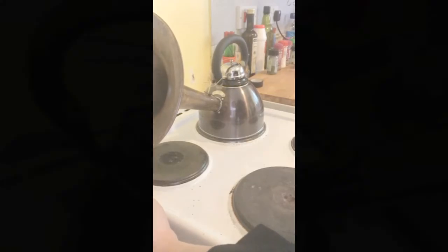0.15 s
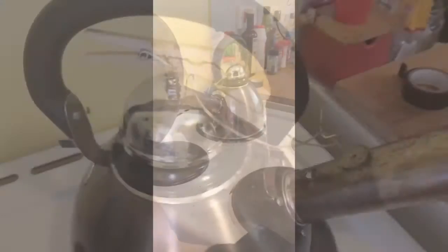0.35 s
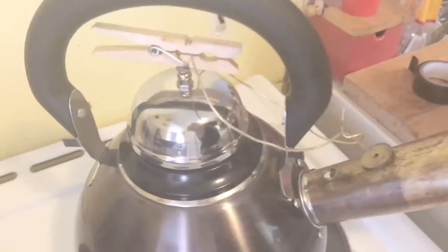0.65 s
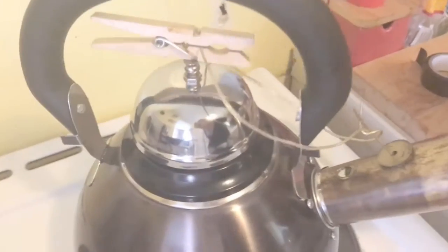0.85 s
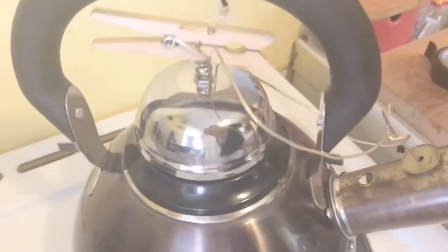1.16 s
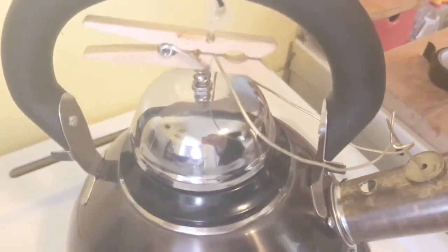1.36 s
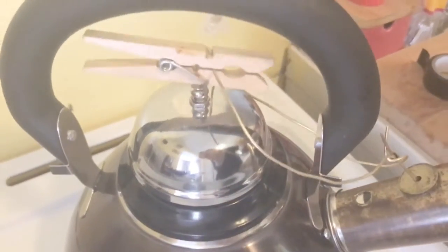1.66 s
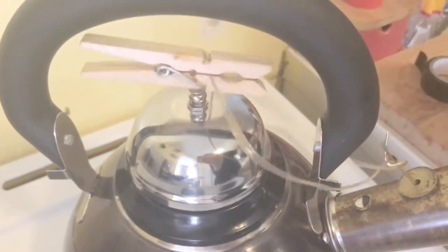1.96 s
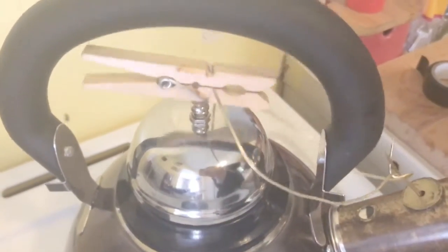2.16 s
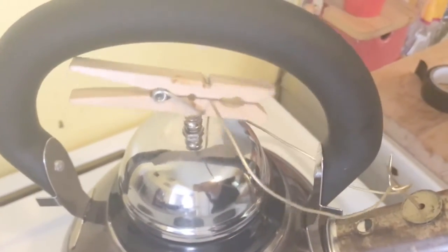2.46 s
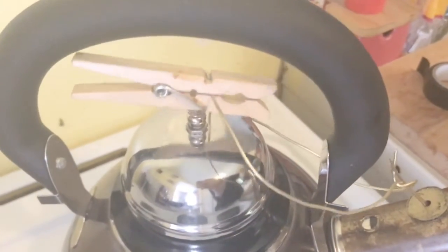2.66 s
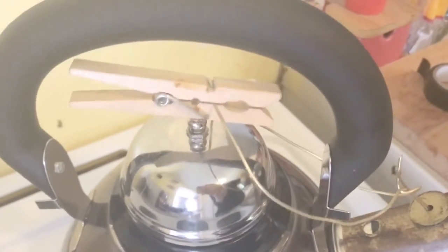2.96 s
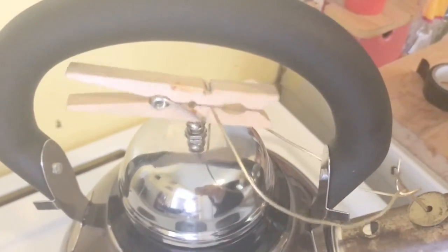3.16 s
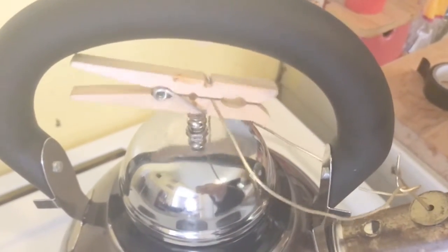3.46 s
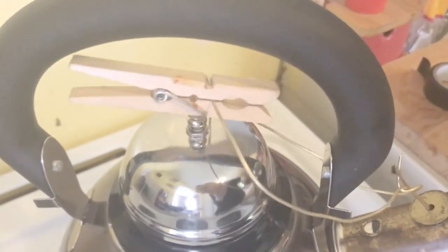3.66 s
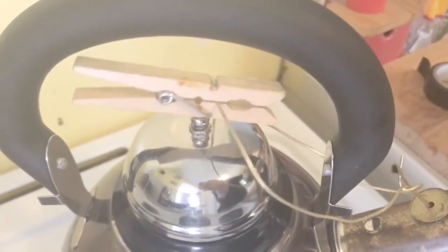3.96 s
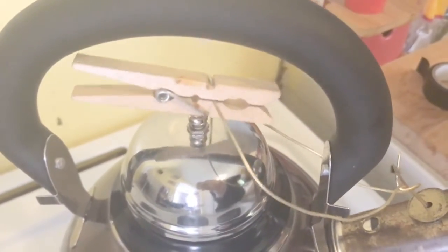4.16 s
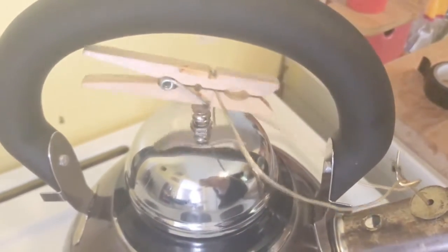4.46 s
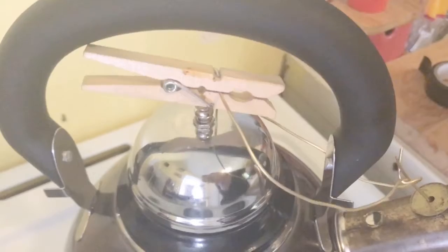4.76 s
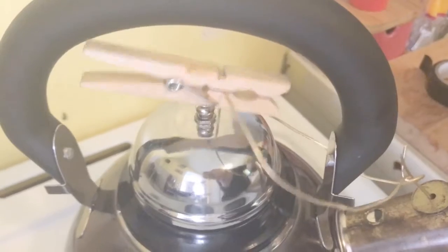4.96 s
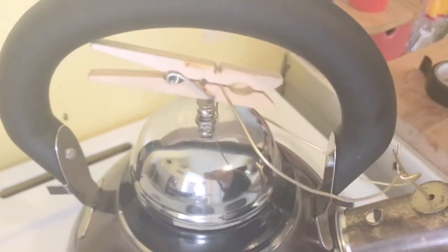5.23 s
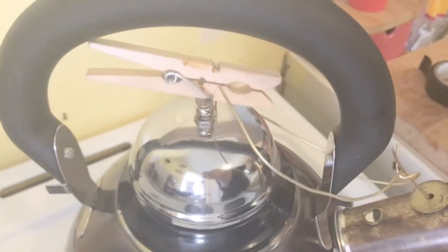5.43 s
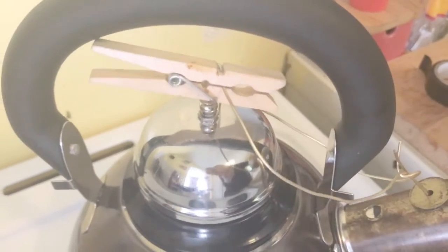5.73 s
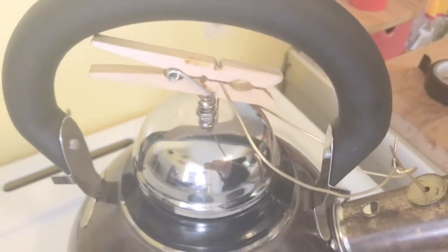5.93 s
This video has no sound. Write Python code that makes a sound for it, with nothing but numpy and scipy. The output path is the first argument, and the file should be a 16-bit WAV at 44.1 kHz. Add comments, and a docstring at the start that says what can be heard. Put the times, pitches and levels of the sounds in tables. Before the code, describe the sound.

A steel kettle rocks on a hotplate, knocking hollowly about five times a second with sharp metal clicks over faint simmering and low hum.

```python
"""Knocks about five times a second, many answered by a sharp metal click, over a simmer and a low hum.
A steel kettle rocks on a hotplate as its water heats, close to the microphone, in a small kitchen.
Each knock sums struck modes of base, hollow and body with bursts of coloured noise for scrape and tick.
Clicks are noise cracks with a short shell ring; blows of both kinds feed the long ring of the lid's dome.
Simmer and bubbles are shaped noise, with pings and thumps; the hum is two sines."""
import sys
import numpy as np
from scipy import signal
from scipy.fft import rfft, irfft, next_fast_len
from scipy.io import wavfile
from scipy.ndimage import map_coordinates

SR = 44100
rng = np.random.default_rng(int(sys.argv[2]) if len(sys.argv) > 2 else 0)


def output_pcm(signal):
    """Save a mono or channel-first signal as 16-bit PCM at the path in sys.argv[1].

    Samples are clipped to [-1, 1] before scaling.
    """
    pcm = np.clip(np.atleast_2d(signal).T, -1, 1) * 32767
    wavfile.write(sys.argv[1], SR, np.round(pcm).astype(np.int16))


N = 268613

# kettle landings on the plate: (time [s], level [dB], hardness [0 soft tilt - 1 hard landing])
LANDINGS = [(0.309, -49, 0), (0.357, -37.5, 1), (0.505, -34.5, 0.19), (0.551, -32, 0.87), (0.698, -30.5, 0),
            (0.745, -28.5, 0.86), (0.888, -30, 0.27), (0.932, -25, 0.89), (1.08, -45.5, 0.59),
            (1.255, -44, 0.15), (1.282, -38.5, 0.57), (1.441, -44, 0), (1.637, -38.5, 0.19),
            (1.66, -31.5, 0.83), (1.821, -47, 0.47), (2.007, -29.5, 0.13), (2.042, -28.5, 0.96),
            (2.219, -26.5, 0.17), (2.269, -24, 0.92), (2.41, -26, 0.13), (2.459, -25.5, 0.82),
            (2.617, -35, 0), (2.641, -29, 0.64), (2.824, -31.5, 0.85), (3.002, -28.5, 0.11),
            (3.038, -26, 0.91), (3.198, -31, 0.29), (3.236, -24.5, 0.87), (3.42, -33.5, 0.65),
            (3.604, -31.5, 0.77), (3.803, -32.5, 0.75), (3.989, -31.5, 0.84), (4.197, -32.5, 1),
            (4.368, -31.5, .2), (4.397, -31.5, 0.69), (4.547, -29.5, 0.21), (4.6, -26, 0.74),
            (4.787, -44.5, 0.92), (4.937, -33.5, 0.56), (4.984, -31, 0.82), (5.151, -32.5, 0.59),
            (5.178, -31, .75), (5.314, -36.5, 0.55), (5.368, -36, 0.56), (5.57, -39.5, .55),
            (5.72, -37.5, 0.51), (5.771, -38.5, 0.52), (5.839, -35.5, 0.78), (5.923, -43.5, 0.57),
            (6.005, -32.5, 0.77)]
# loose metal snaps: (time [s], level [dB], extra drive to the dome [dB])
SNAPS = [(0.5666, -26.5, 8), (0.764, -17.5, -3), (0.948, -23, 1), (1.1137, -23.5, 4), (1.6735, -22.5, 0.5),
         (1.858, -22, 4), (2.0755, -12.5, 2), (2.1771, -23, -10), (2.2892, -20, 8.5), (2.4813, -15.5, 6),
         (2.6592, -22.5, -35), (2.8669, -16, -11), (2.9591, -27.5, 7), (3.2563, -13, 1), (3.2703, -25, 7),
         (3.3399, -31, -18), (3.6334, -18, 2.5), (3.8344, -18, 6.5), (4.0372, -17, 1), (4.049, -25.5, -7),
         (4.106, -29.5, -15), (4.249, -21.5, -26), (4.4326, -21, 3.5), (4.6323, -19.5, -0.5),
         (4.8028, -26.5, -20), (5.0201, -11, 2), (5.2267, -25.5, -7.5), (5.4062, -19.5, 4.5),
         (5.6048, -17, 4.5), (5.803, -18, 1), (6.0011, -22, 1)]
# water-filled body on the stove top: (frequency [Hz], relative level [dB], t60 [s])
BODY_MODES = [(135.3, -11.5, 0.35), (155.4, -3.5, 0.25), (173.5, -4, 0.32), (260, -14, 0.068),
              (256, -3.5, 0.35), (261.9, -1.5, 0.29), (272, -6.5, 0.059), (330, -7, 0.1)]
# hollow clunk noise: (frequency [Hz], relative density [dB])
CLUNK_SPECTRUM = [(300, -40), (500, -36), (650, 9), (790, -10), (950, 2.5), (1150, 9.5), (1450, 3.5),
                  (1900, -0.5), (2500, -13), (5000, -55)]
# scraping steel noise: (frequency [Hz], relative density [dB])
SCRAPE_SPECTRUM = [(1500, -4), (2400, -8.5), (3200, 4), (4050, 5.5), (5000, 3.5), (6000, 2), (7500, 0.5),
                   (9500, 4.5), (10400, -26), (12000, -12), (16000, -29)]
# hard-contact tick noise: (frequency [Hz], relative density [dB])
TICK_SPECTRUM = [(1000, -21.5), (4000, -7.5), (7500, -12.5), (9700, -0.5), (10400, -0.5), (11400, 10),
                 (12100, 1), (12700, 7), (14000, -5), (14900, 1), (16000, -20)]
# dense shell ring: (frequency [Hz], relative density [dB])
CLANG_SPECTRUM = [(150, -1), (450, -2.5), (1000, -2), (2400, 1.5), (3750, 10), (4900, -2.5), (6200, 8),
                  (7700, 3), (9600, 5), (10350, -9), (11400, 11.5), (12500, -2), (14400, 2.5), (15100, 2),
                  (15700, -17), (16300, -43)]


def amp(db):
    """Decibels to gain."""
    return 10 ** (np.asarray(db) / 20)


def unit(x):
    """Scale to rms 1."""
    return x / np.sqrt(np.mean(x ** 2) + 1e-20)


def along(points, hz):
    """Interpolate (Hz, value) points on a log frequency axis."""
    point_hz, values = np.transpose(points)
    return np.interp(np.log(hz + 1), np.log(point_hz), values)


def wobble(rate_hz):
    """A smooth random curve with rate_hz knots a second."""
    knots = rng.standard_normal(int(N * rate_hz / SR) + 4)
    return map_coordinates(knots, [np.arange(N) * rate_hz / SR])


def noise(spectrum, size):
    """Coloured noise of rms 1."""
    m = next_fast_len(size)
    gain = amp(along(spectrum, np.fft.rfftfreq(m, 1 / SR)))
    return unit(irfft(rfft(rng.standard_normal(m)) * gain, m)[:size])


def varied(spectrum, scatter_db):
    """The same spectrum, coloured a little by where the contact falls."""
    return [(hz, db + scatter_db * rng.standard_normal()) for hz, db in spectrum]


def fade(t, t60):
    """Free decay: 60 dB in t60 seconds."""
    return np.exp(-np.log(1000) * t / t60)


def swell(t, peak_s):
    """Rises to 1 at peak_s and falls away."""
    return t / peak_s * np.exp(1 - t / peak_s)


def onset(t, rise_s):
    """Exponential rise from 0 towards 1."""
    return 1 - np.exp(-t / rise_s)


def grit(t, depth_db):
    """Gain of rms 1 that varies from one tiny contact to the next, about a millisecond apart."""
    knots = rng.standard_normal(int(t[-1] * 1000) + 4)
    return unit(amp(depth_db * map_coordinates(knots, [t * 1000])))


def ring(modes, t, scatter_db):
    """Decaying modes, struck at new strengths and phases each time."""
    hz, db, t60 = np.transpose(modes)[:, :, None]
    gain = amp(db + scatter_db * rng.standard_normal(hz.shape))
    phase = rng.uniform(0, 2 * np.pi, hz.shape)
    return np.sum(gain * fade(t, t60) * np.sin(2 * np.pi * hz * t + phase), axis=0)


def add(track, start_s, sound):
    """Mix a sound in at start_s."""
    part = track[round(start_s * SR):][:len(sound)]
    part += sound[:len(part)]


def contact(hardness):
    """Thud, scrape and tick [dB re knock]: harder means less thud, more scrape, much more tick."""
    h = np.clip(hardness, 0, 1)
    thud_db = -7.5 - 16.5 * h ** 3
    scrape_db = -8 + 7.5 * h ** 3
    tick_db = 3 - 35.5 * (1 - h) ** 2
    return thud_db, scrape_db, tick_db


def bubbles(t):
    """Collapsing bubbles: a short fizz of noise and a gritty ping of the base near 3 kHz."""
    pitch_hz = 2950 * np.exp(0.0205 * rng.standard_normal())
    ping = 1.44 * np.sin(2 * np.pi * pitch_hz * t) * grit(t, depth_db=3.5)
    fizz = noise(varied(SCRAPE_SPECTRUM, scatter_db=8), size=len(t))
    fizz += 0.5 * noise(TICK_SPECTRUM, size=len(t))
    fizz += 0.48 * noise(CLUNK_SPECTRUM, size=len(t))
    return (ping + fizz) * swell(t, 0.0052)


def water():
    """Simmering water: an uneven rumble, a faint hiss and bubbles collapsing on the hot base."""
    # simmer strength, driving rumble, hiss and bubbles: (time [s], level [dB])
    heat = [(0.25, -69.5), (0.6, -58), (1.5, -65), (2.1, -58.5), (3.5, -59), (4.2, -56), (4.85, -58.5),
            (5.4, -56.5), (6.09, -57.5)]
    # low boil noise: (frequency [Hz], relative density [dB])
    rumble_spectrum = [(25, -30), (36, -1), (48, -31), (62, -10), (76, 1.5), (105, -9), (140, 4),
                       (205, -13.5), (265, 1.5), (330, -12.5), (480, -18), (900, -45)]
    # hiss noise: (frequency [Hz], relative density [dB])
    hiss_spectrum = [(240, -26), (400, -9), (520, -16), (666, 2), (777, -5.5), (1220, -4), (1600, -12),
                     (2360, -10), (3690, -9), (5270, -14), (11400, -20.5), (14100, -18), (16000, -30)]
    min_hardness, lead_s, lead_spread_s = 0.58, 0.04, 0.012
    fizz_db, thump_db, stray_db = 5, 0.5, 2  # fizz and stray re simmer, thump re fizz

    heat_s, heat_db = np.transpose(heat)
    simmer_db = np.interp(np.arange(N) / SR, heat_s, heat_db)
    rumble_db = -58 + 1.6 * (simmer_db - simmer_db.mean() - 0.5)
    rumble = amp(rumble_db + 1.03 * wobble(18)) * noise(rumble_spectrum, size=N)
    hiss = amp(simmer_db - 2 + 4.3 * wobble(22)) * noise(hiss_spectrum, size=N)

    fizzes, strays = np.zeros(N), np.zeros(N)
    t, t_thump = np.arange(SR // 16) / SR, np.arange(SR // 2) / SR
    for landing_s, _, hardness in LANDINGS:
        if hardness > min_hardness:  # bubbles collapse shortly before each hard landing
            start_s = landing_s - lead_s + lead_spread_s * rng.uniform(-1, 1)
            thump = ring(BODY_MODES, t_thump, scatter_db=3.5) * onset(t_thump, 0.018)
            add(fizzes, start_s, bubbles(t))
            add(fizzes, start_s, amp(thump_db) * thump)
    for when, weakness in rng.random((50, 2)):
        # the cube root crowds stray bubbles towards the end, as the water gets hotter
        add(strays, when ** (1 / 3) * N / SR, amp(3 - 10 * weakness) * bubbles(t))
    return rumble + hiss + amp(simmer_db) * (amp(fizz_db) * fizzes + amp(stray_db) * strays)


def hum():
    """Mains hum and its octave, slightly unsteady, growing as the microphone moves in."""
    # mains, then octave: (far rms level [dB], near rms level [dB], time constant [s])
    approach = [(-79, -59.5, 3.1), (-82, -62, 0.44)]
    mains_hz = 49.45
    t, out = np.arange(N) / SR, np.zeros(N)
    for harmonic, (far_db, near_db, settle_s) in enumerate(approach, 1):
        level_db = near_db + (far_db - near_db) * np.exp(-t / settle_s)
        gain = np.sqrt(2) * amp(level_db + 0.54 * wobble(2.87))
        out += gain * np.sin(2 * np.pi * harmonic * mains_hz * t)
    return out


def dome():
    """Every blow tops up the energy in the long, bell-like ring of the lid's dome."""
    # steel dome: (frequency [Hz], relative level [dB], t60 [s])
    dome_modes = [(981, -11, 1.4), (2019, -15, 1.4), (2582, -.5, 1.5), (4781, -.5, 2.0), (7563, -2, 1.3),
                  (10810, -14, 1.1), (14490, -4, .45)]
    t, out = np.arange(N) / SR, np.zeros(N)
    blows = [(0.0039, -17, 0), *SNAPS]  # first entry: still singing from an earlier blow
    blows += [(s, db + contact(hardness)[1], 0) for s, db, hardness in LANDINGS]
    blow_s, blow_db, drive_db = np.transpose(blows)
    blow_index = np.round(np.abs(blow_s) * SR).astype(int)
    for hz, mode_db, t60 in dome_modes:
        scatter_db = 2 * rng.standard_normal(len(blow_s))
        # the loose mount passes on hard blows only in part
        kick = amp(0.81 * blow_db - 46 + drive_db + mode_db + scatter_db)
        feed = np.bincount(blow_index, kick ** 2, N)[:N]
        energy = signal.lfilter([1], [1, -fade(2 / SR, t60)], feed)  # decays at twice the amplitude rate
        out += np.sqrt(energy) * amp(2 * wobble(6)) * np.sin(2 * np.pi * hz * t)
    return out


def clang(t):
    """The shell's dense ring mixed with the kitchen's echo; its strongest modes stand out."""
    # shell and kitchen: (frequency [Hz], t60 [s])
    damping = [(200, 0.44), (1000, 0.37), (3700, 0.21), (7000, 0.2), (11500, 0.19), (16000, 0.17)]
    # thin shell: (frequency [Hz], relative level [dB], t60 [s])
    shell_modes = [(625, -6, .2), (675, -9, .2), (965, -8, .25), (1077, -7, .22), (1215, -5, .35),
                   (1991, -11, .3), (2900, -9, .3), (3290, -8, .25), (3641, -5, .27), (3680, -6, .3),
                   (3777, -4, .28), (4021, -7, .28), (4081, -6, .28), (5981, -10, .3), (9895, -10, .3),
                   (11323, -8, .26), (11504, -6, .26)]
    hz, frame_s, z = signal.stft(noise(CLANG_SPECTRUM, size=len(t)), SR, nperseg=256)
    decay = fade(frame_s, along(damping, hz)[:, None])
    wash = signal.istft(z * decay, SR, nperseg=256)[1][:len(t)]
    return wash + amp(-11) * ring(shell_modes, t, scatter_db=4.5)


def knocks():
    """The base lands with a hollow knock, bumps again as it skids for milliseconds, and shakes the body."""
    # air space inside: (frequency [Hz], relative level [dB], t60 [s])
    hollow_modes = [(630, -12, .1), (690, -14, .08), (844, -14, .1), (962, -3, .085), (1077, 0, .1),
                    (1215, -6, .1), (1340, -7, .06), (1480, -11, .05), (1700, -12, .06)]
    # thick base, damped by the water: (frequency [Hz], relative level [dB], t60 [s])
    base_modes = [(2950, -7, .04), (3330, -4, .035), (3790, -1, .04), (4040, 4, .045), (4440, -3, .035),
                  (5330, -3, .035), (6030, -3, .035), (6650, -6, .03), (8285, -3, .055), (8900, -3, .05),
                  (9700, -3, .05), (9910, -3, .055), (10700, -2, .05), (11330, -3, .045), (11950, -1, .045),
                  (14720, -5, .05), (15350, -7, .05)]
    thud_evenness, typical_db = 0.29, -31.5  # extra thud [dB] per dB below a typical knock

    out, t = np.zeros(N), np.arange(SR // 2) / SR
    for start_s, db, hardness in LANDINGS:
        thud_db, scrape_db, tick_db = contact(hardness)
        # a soft landing knocks a little higher than a hard one and skids later
        pitch_hz = 1090 * np.exp(0.021 * rng.standard_normal() - 0.0085 * tick_db)
        lag_s = np.clip(0.0062 - 0.0001253 * tick_db, 0.004, 0.011)

        knock = amp(-3.5) * np.sin(2 * np.pi * pitch_hz * t) * swell(t, 0.0015) ** 2
        hollow = amp(-11) * ring(hollow_modes, t, scatter_db=2.5) * onset(t, 0.00047)
        clunk = amp(-13.5) * noise(CLUNK_SPECTRUM, size=len(t)) * onset(t, 0.0018) * fade(t, 0.14)

        # the heavy body thuds even under a light knock
        thud_gain = amp(thud_db - 6.5 + thud_evenness * (typical_db - db))
        thud = thud_gain * ring(BODY_MODES, t, scatter_db=3.5) * onset(t, 0.0016)

        skid = 0.85 * swell(t, lag_s) ** 3 + 0.3 * swell(t, 2 * lag_s)
        skid += 0.35 * hardness * swell(t, lag_s / 4)
        skid *= grit(t, depth_db=4.5)
        scrape = amp(scrape_db - 6.5) * noise(varied(SCRAPE_SPECTRUM, scatter_db=2), size=len(t)) * skid

        # the skid pumps up the base modes; a soft landing hardly drives the highest
        struck = []
        for hz, mode_db, t60 in base_modes:
            drive_db = np.interp(hz, [9000, 11000], [scrape_db, tick_db - 4])
            struck.append((hz, mode_db + drive_db, t60))
        base = amp(-5.5) * ring(struck, t, scatter_db=4) * (1 - np.exp(-(1.62 * t / lag_s) ** 2))

        tick_decay = fade(t, 0.029) + 0.37 * fade(t, 0.17)
        tick = amp(tick_db - 8.5) * noise(varied(TICK_SPECTRUM, scatter_db=1), size=len(t)) * tick_decay
        shell = amp(scrape_db - 13) * clang(t) * onset(t, lag_s)

        landing = knock + hollow + clunk + thud + scrape + base + tick + shell
        add(out, start_s, amp(db) * landing)
        add(out, start_s + lag_s * rng.uniform(1, 1.292), amp(db - 6) * knock)  # second bump
    return out


def clicks():
    """Steel snaps against steel, rebounds once and sets the shell ringing."""
    # steel-on-steel snap: (frequency [Hz], relative density [dB])
    crack_spectrum = [(500, 2.5), (2000, -39), (4000, -31), (6500, 7.5), (9000, 7.5), (11500, 18.5),
                      (14500, 14.5), (16500, -3)]
    out, t = np.zeros(N), np.arange(SR // 2) / SR
    for start_s, db, _ in SNAPS:
        crack = amp(-8) * noise(varied(crack_spectrum, scatter_db=2), size=len(t))
        crack *= swell(t, 0.00073) ** 2
        splash = amp(-14.5) * noise(varied(CLANG_SPECTRUM, scatter_db=1), size=len(t))
        splash *= fade(t, 0.04) * grit(t, depth_db=4.5)
        shell = amp(-21) * clang(t)
        spread = onset(t, 0.0008)  # the blow spreads over the shell
        rebound = noise(TICK_SPECTRUM, size=len(t)) * fade(t, 0.031)
        add(out, start_s, amp(db) * (crack + (splash + shell) * spread))
        add(out, start_s + rng.uniform(0.0086, 0.0087), amp(db - 17.5) * rebound)
    return out


def scene():
    """The rattling kettle over its simmer and the hum."""
    return (water() + hum() + dome() + knocks() + clicks())[None]


def record(dry):
    """A quick fade-in; the small microphone drops the deepest bass and all above its band limit."""
    low_hz, top_hz, fade_start_s, fade_length_s = 42, 16200, 0.22, 0.08
    opened = dry * np.clip((np.arange(N) / SR - fade_start_s) / fade_length_s, 0, 1)
    thinned = signal.sosfilt(signal.butter(4, low_hz, "high", fs=SR, output="sos"), opened)
    m = next_fast_len(N + SR // 2)
    band_limit = 1 / (1 + (np.fft.rfftfreq(m, 1 / SR) / top_hz) ** 80)
    return irfft(rfft(thinned, m) * band_limit, m)[..., :N]


dry = scene()
out = record(dry)
output_pcm(out)
```